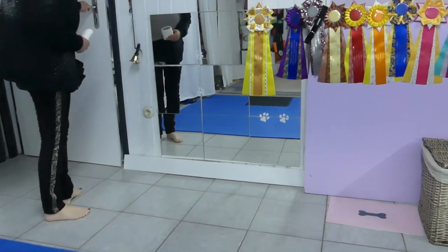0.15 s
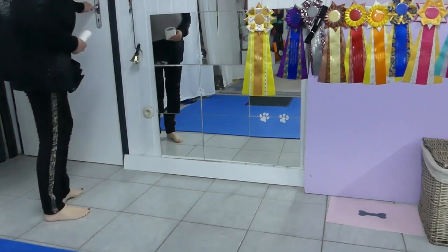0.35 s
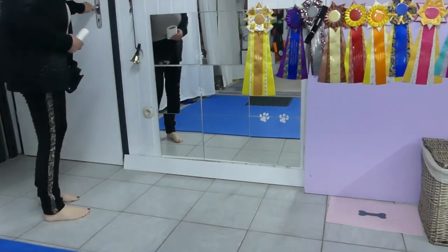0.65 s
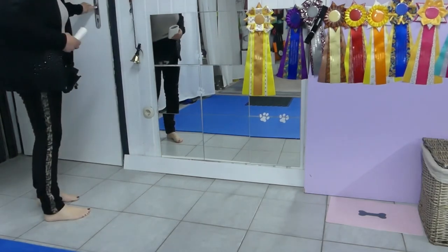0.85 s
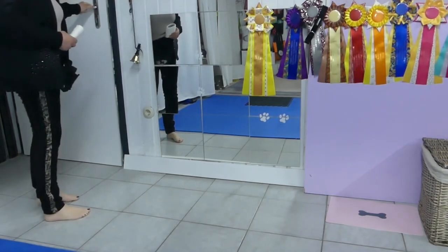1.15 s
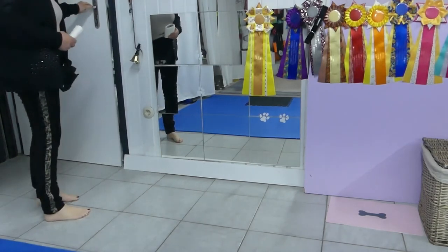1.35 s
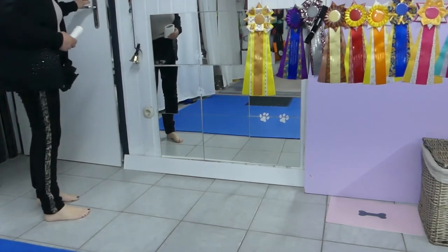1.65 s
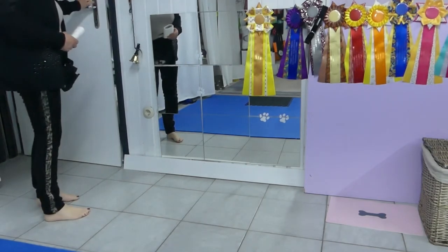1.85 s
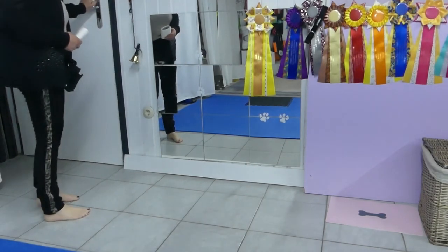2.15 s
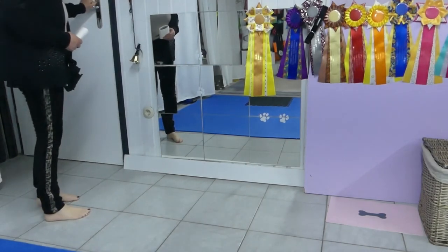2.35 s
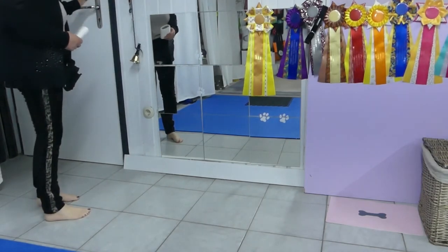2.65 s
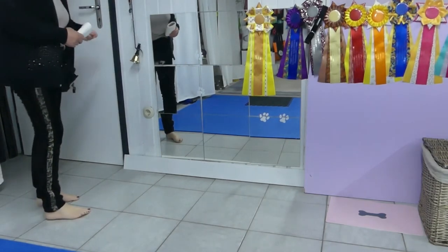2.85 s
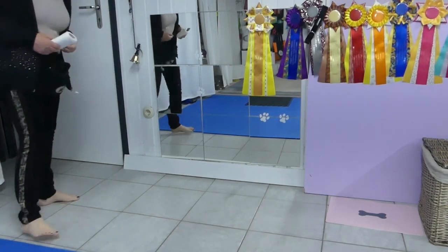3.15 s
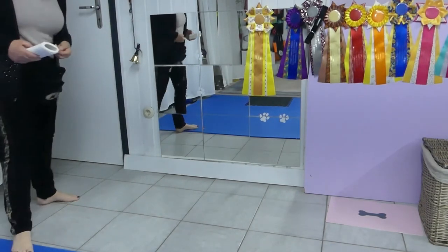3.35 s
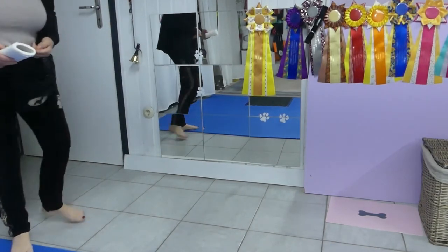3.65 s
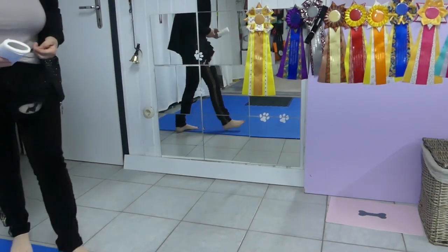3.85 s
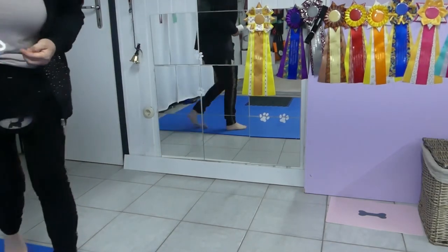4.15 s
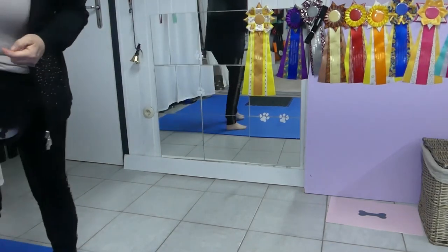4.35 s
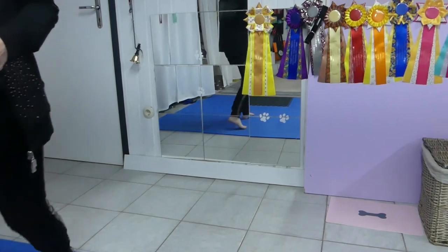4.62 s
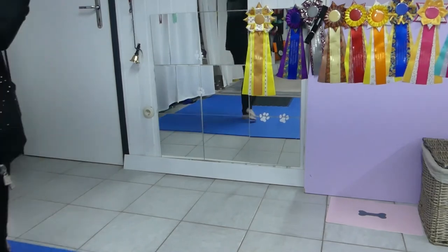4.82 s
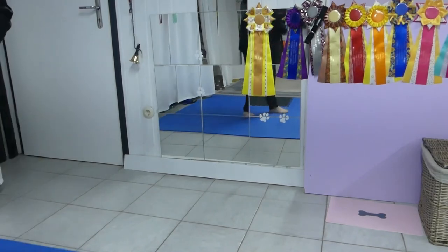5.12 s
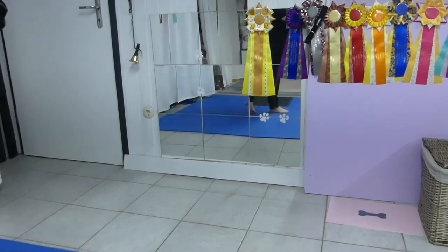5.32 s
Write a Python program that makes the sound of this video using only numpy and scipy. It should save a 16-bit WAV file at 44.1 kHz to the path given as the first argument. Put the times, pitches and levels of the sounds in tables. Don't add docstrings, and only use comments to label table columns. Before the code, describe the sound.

Stuttering hinge creak and metallic latch clack, a brief rattle, a hard door slam, then faint zip ticks and rustling as someone walks off barefoot.

```python
import sys
import numpy as np
from scipy import signal
from scipy.fft import rfft, irfft, next_fast_len
from scipy.io import wavfile
from scipy.ndimage import map_coordinates

SR = 44100
rng = np.random.default_rng(int(sys.argv[2]) if len(sys.argv) > 2 else 0)


def invert_db(level):
    return 10 ** (np.asarray(level, dtype=float) / 20)


def bounce(signal):
    frames = np.transpose(np.atleast_2d(signal))
    limited = np.clip(frames, -1, 1)
    pcm = np.round(limited * 32767).astype(np.int16)
    wavfile.write(sys.argv[1], SR, pcm)


N = 241800
LATCHED, LEANS, SHUT = 0.36, 0.75, 2


def unit(x):
    return x / np.sqrt(np.mean(x ** 2) + 1e-20)


def along(points, hz):
    f, v = np.transpose(points)
    return np.interp(np.log(hz + 1), np.log(f + 1), v)


def filtered(x, response):
    m = next_fast_len(x.shape[-1] + SR // 2)
    spectrum = rfft(x, m) * response(np.fft.rfftfreq(m, 1 / SR))
    return irfft(spectrum, m)[..., :x.shape[-1]]


def body(peaks):
    def response(f):
        h = 0
        for k, (centre, width, db) in enumerate(peaks):
            damping = 1j * f * width
            h = h + (-1) ** k * invert_db(db) * damping / (centre * centre - f * f + damping)
        return h / np.sqrt(np.mean(abs(h) ** 2))
    return response


def coloured(spectrum):
    return unit(filtered(rng.standard_normal(N), lambda hz: invert_db(along(spectrum, hz))))


def hollow(hz, width):
    return unit(filtered(rng.standard_normal(N), lambda f: body([(hz, width, 0)])(f) ** 2))


def paired(pair, alike):
    turn = lambda hz: np.arccos(np.clip(along(alike, hz), -1, 1)) / 2
    mid, side = filtered(pair, lambda hz: np.array([np.cos(turn(hz)), np.sin(turn(hz))]))
    return np.array([mid + side, mid - side])


def burst(s, db, length, fall, rise=0.001):
    out, first = np.zeros(N), int(s * SR) + 1
    t = np.arange(first, min(N, first + int((length + 2 * fall) * SR))) / SR - s
    decay = invert_db(db - 60 * np.maximum(t - length, 0) / fall)
    out[first:first + len(t)] = decay * np.minimum(t / rise, 1)
    return out


def ring(s, db, hz, t60, rise=0.00013, sag=0):
    sag_s = 0.0391
    out, first = np.zeros(N), round(s * SR)
    t = np.arange(min(N - first, int(1.5 * t60 * SR))) / SR
    bent = t - sag * sag_s * np.expm1(-t / sag_s)
    out[first:first + len(t)] = invert_db(db - 60 * t / t60) * np.sin(2 * np.pi * hz * bent) * (1 - np.exp(-t / rise))
    return out


# f/Hz, level/dB
TONE_COLOUR = [(12, -36), (20, -20), (156, -4), (189, -3), (224, -3), (273, -3.5), (440, -4.5), (1240, -15),
               (1350, -16.5), (1950, -19.5), (2970, -26.5), (15200, -26.5), (16500, -54.5)]
# f/Hz, left-right likeness
TONE_ALIKE = [(60, -0.65), (180, -0.86), (550, -0.74), (1650, -0.52), (4970, 0.27), (15000, 0.45)]


def hush():
    pair = paired(rng.standard_normal((2, N)), TONE_ALIKE)
    return invert_db(-55) * unit(filtered(pair, lambda hz: invert_db(along(TONE_COLOUR, hz))))


# t/s, peak level/dB
PUSHED = [
    (0.0322, -38),
    (0.0839, -32),
    (0.135, -31.5),
    (0.1799, -31),
    (0.2197, -29.5),
    (0.2561, -30.5),
    (0.2916, -30),
    (0.3261, -29.5),
]
# t/s, length/s, peak level/dB, peak delay/s, rise and fall/(dB/s)
CHATTER = [
    (0.7133, .015, -40, .001, 150),
    (0.7966, .075, -31.5, 0.03, 100),
    (1.0817, .045, -36, .001, 402),
    (1.1634, .005, -43.5, 0.0012, 200),
    (1.2145, .005, -46, 0.00094, 197),
]


def slips(count=9):
    jerks = [(s, db, -11.5 + 22.5 * s, -3, -11.5) for s, db in PUSHED]
    first_gap_s, quickens = 0.0142, 0.935
    after = first_gap_s * (1 - quickens ** np.arange(count)) / (1 - quickens)
    for s, length, db, peak, slope_db in CHATTER:
        for t in after[after < length]:
            jerks.append((s + t, db - slope_db * abs(t - peak), -13.5, -15, -35.5))
    return jerks


def jerk(s, db, pitch, count=200):
    out, t = np.zeros(N), np.arange(-count, count) / SR
    plate_hz, wind_up_s, spike_s = 1500, 0.0009, 0.00016
    swell = np.exp(np.where(t < 0, t, -4 * t) / wind_up_s)
    wound = invert_db(4) * np.cos(2 * np.pi * plate_hz * pitch * t) * swell
    spike = invert_db(5.5) * np.exp(-(pitch * t / spike_s) ** 2)
    shape = -wound - spike if s < LATCHED else spike
    out[round((s - 0.0002) * SR) - count:][:2 * count] = invert_db(db) * shape
    return out


# f/Hz, width/Hz, level/dB
LEAF_BODY = [(96.4, 5.9, -0.5), (214, 43, 2), (294, 45, 3.5), (369, 59, 4), (473, 82, -0.5), (693, 73, -3),
             (884, 13, -5.5), (1180, 150, -14), (1387, 44, -6), (1470, 21, -32), (1670, 36, -5.5),
             (2100, 120, -13.5), (2350, 67, -8.5)]
# f/Hz, level/dB
GRIT_COLOUR = [(2400, -32), (3000, -5.5), (3600, -4), (5500, -3), (7000, -6.5), (10400, -11.5),
               (15500, -18), (16500, -35)]
# f/Hz, level/dB
GROAN = [(41, -36.5), (70, 3), (428, 4.5), (621, -4), (933, -4.5), (1140, -8.5), (1840, -16.5), (2300, -16),
         (2800, -32.5), (4000, -47.5), (5200, -55), (8800, -120)]
# f/Hz, level/dB
SHUDDER = [(59, -38), (100, -10), (407, 2), (628, -2.5), (895, 1.5), (1340, -8.5), (2230, -13), (3030, -28),
           (4000, -32), (5200, -56.5), (8800, -120)]


def hinge():
    jolts, spit, shudder, knock = np.zeros((4, N))
    for (s, db, grit_db, shudder_db, _), pitch in zip(slips(), rng.uniform(0.81, 1.2, size=40)):
        jolts[round(s * SR)] = invert_db(db + 15.5)
        knock += jerk(s, db, pitch)
        spit += burst(s - 0.002, db + grit_db - 5, 0.002, 0.015)
        spit += burst(s, db + grit_db - 24, 0.0072, 0.19)
        shudder += burst(s + 0.002, db + shudder_db, 0.0081, 0.099)
    dull = lambda hz: 1 / (1 + 1.3j * hz / 2500 - (hz / 2500) ** 2) ** 2
    wood = filtered(filtered(jolts, body(LEAF_BODY)), dull)
    colour = np.where(np.arange(N) < LATCHED * SR, coloured(GROAN), coloured(SHUDDER))
    return wood + spit * coloured(GRIT_COLOUR) + shudder * colour, knock


# f/Hz, level/dB, t60/s
BOOM_MODES = [
    (63.48, 1, .93),
    (67.44, -9.8, .91),
    (69.21, -4, .94),
    (77.5, -20, .6),
              (96.5, -8, 1), (101, -9, 0.53), (111.6, -12, 0.7), (171.4, -17, 0.81)]


def boom():
    blows = [(s, boom_db) for s, *_, boom_db in THUDS]
    blows += [(s, db + boom_db) for s, db, *_, boom_db in slips()]
    kicks = np.zeros((2, N))
    for s, db in blows:
        kicks[int(s >= SHUT), round(s * SR)] += invert_db(db)
    modes = []
    for lasting in (0.6, 1):
        modes.append(sum(ring(0, db, hz, t60 * lasting, 0.015) for hz, db, t60 in BOOM_MODES))
    return signal.fftconvolve(kicks, modes, axes=1)[:, :N].sum(axis=0)


# t/s, level/dB
STRIKES = [(.0335, -51), (0.0846, -59), (.136, -43), (0.179, -45.5), (.22, -48), (.257, -41), (.292, -37.5),
           (0.328, -34.5), (.366, -33), (0.391, -29), (.558, -38), (.81, -45), (.847, -42.5),
           (1.083, -56.5), (2.099, -26), (2.111, -31)]
# f/Hz, level/dB, t60/s
AJAR = [(143, -9, 0.12), (188.6, -2, 0.16), (249, -14, 0.78), (392.6, -8, 0.67), (484, -20, 0.95),
        (543, -12, 0.19), (668, -6, 0.52), (778, -9, 0.41), (893.6, 0, 0.32), (1174, -6, 0.3)]
# f/Hz, level/dB, t60/s
RESTING = [(251, -14, 0.61), (375, -5, 0.25), (503, -17, 0.47), (557, 6.5, 0.43), (630, -27, 0.41),
           (730, -14, 0.3), (895, 2.5, 0.24), (1050, -28, 0.41)]
# f/Hz, level/dB, t60/s
SEATED = [(155.5, 8, 0.17), (227, -4, 0.33), (308, -32, 0.16), (398, 3.5, 0.133), (434, -15, 0.62),
          (579, -13.5, 0.44), (850, -23, 0.218), (1160, -30.5, 0.79)]


def panel():
    out = np.zeros(N)
    sway = rng.normal(0, 2.4, (len(STRIKES), len(AJAR)))
    for (s, db), row in zip(STRIKES, sway):
        modes = AJAR if s < LEANS else RESTING if s < SHUT else SEATED
        for (hz, level, t60), odd in zip(modes, row):
            out += ring(s, db + level + odd, hz, t60, 0.0046, sag=0.15 * (s > SHUT))
    return out


# t/s, level/dB, length/s, ring f/Hz, ring level/dB
CONTACTS = [(0.3572, -28.5, 0.002, 3940, 2), (0.3605, -25.5, 0.0042, 3870, 1.5),
            (0.367, -29.5, 0.0054, 4400, -1), (0.382, -37.5, 0.028, 4170, -13),
            (0.459, -46.5, 0.0082, 7160, -17), (0.55, -38, 0.002, 3280, -12),
            (0.5548, -34.5, 0.0052, 9000, -11.5), (0.572, -42, 0.013, 4980, -3.5),
            (0.713, -48.5, 0.0047, 4800, -6), (0.72, -49.5, 0.011, 3340, -5),
            (0.734, -57.5, 0.035, 2500, -2), (0.403, -38, .004, 5160, -3), (0.414, -40, .006, 3900, 1),
            (2.141, -37, .006, 2500, -9), (2.16, -44, .006, 5600, -8), (1.155, -58, 0.02, 3600, -13),
            (2.078, -51, 0.005, 3500, -20), (2.0878, -25, 0.0022, 2420, -10),
            (2.089, -21, 0.0061, 3530, -10.5), (2.116, -28.5, 0.0038, 5350, -14),
            (2.126, -30, 0.0044, 5970, -9)]
# f/Hz, level/dB
STEEL = [(900, -38.5), (1400, -4.5), (1800, -5.5), (2920, -4.5), (3750, -4.5), (4430, -5.5), (8930, -10.5),
         (14800, -22.5), (16500, -28.5)]
# t/s, level/dB, f/Hz, t60/s
PINGS = [
    (.556, -29.5, 5900, 0.035),
    (.3615, -26, 3850, 0.035),
    (2.092, -23.5, 5600, .04),
    (2.117, -26, 5400, 0.045),
]


def latch():
    out, tone = np.zeros((2, N))
    for s, db, length, ring_hz, ring_db in CONTACTS:
        tilt_db = np.clip(0.2 * (db + 25), -8.5, 0)
        chatter = coloured([(hz, level + tilt_db * np.log2(hz / 4000)) for hz, level in STEEL])
        out += burst(s, db, length, 0.056) * chatter
        tone += burst(s, db + ring_db, length, 0.036) * hollow(ring_hz, 480)
    for s, db, hz, t60 in PINGS:
        tone += ring(s, db, hz, t60, 0.0012)
    return out, tone


# t/s, level/dB, length/s, boom level/dB
THUDS = [(0.358, -23.5, 0.024, -43.5), (0.382, -24, 0.043, -30), (0.434, -41, 0.019, -32.5),
         (0.556, -38.5, 0.04, -39), (0.71, -42, 0.023, -51), (1.268, -66, 0.13, -67.5),
         (2.024, -58, 0.15, -78), (2.077, -34, 0.026, -76), (2.098, -21, 0.0016, -77),
         (2.109, -22, 0.0042, -71.5), (2.1125, -44.5, .002, -24.5), (2.119, -32.5, 0.0045, -67.5)]
# f/Hz, level/dB
FRAME = [(47, -29.5), (80, -8), (104, -15), (166, -0.5), (290, -11), (385, 1), (430, -4.5), (549, -7.5),
         (710, -12), (865, -7), (1150, -19.5), (1610, -16.5), (2460, -37), (3000, -43.5), (3900, -36.5),
         (6600, -120)]


def thuds():
    return coloured(FRAME) * sum(burst(s, db, length, 0.11) for s, db, length, _ in THUDS)


# t/s, level/dB, width/s
SLAPS = [
    (2.1003, -10, .0006),
    (2.111, -13, .0009),
    (.4368, -17, .0008),
]


def slap():
    out = np.zeros(N)
    for s, db, width in SLAPS:
        u = ((np.arange(N) / SR - s) / width) ** 2
        out += invert_db(db) * (2 * u - 1) * np.exp(-u)
    return out


# t/s, peak level/dB, ring level/dB, rebound level/dB
TICKS = [(0.661, -49, -24, -14), (0.912, -37, 1, -11), (1.1543, -47, -22.5, -15), (3.6268, -38, 5, 0),
         (4.0823, -45.5, -16, -10), (4.3135, -40, 2, -4.5), (4.8232, -34.5, -4, -23),
         (4.8932, -36.5, -20, -16), (5.0587, -38.5, -21.5, -20), (5.1117, -37.5, -1, -10),
         (5.138, -55, -8, -20), (5.16, -54, -8, -20)]
# t/s, peak level/dB, rattle level/dB
JANGLES = [
    (3.15, -34, -56),
    (3.3685, -38.5, -60.5),
]
# t/s from the jolt, level/dB
JANGLE = [
    (-.004, -4),
    (-.0018, -7),
    (0, -5),
    (.0035, -0.5),
    (.006, -10),
    (.021, -14),
    (.032, -13),
]
# f/Hz, level/dB, t60/s
TAB = [
    (13850, -4, 0.03),
    (13100, -11, .03),
    (9500, -19, 0.062),
]
# f/Hz, level/dB
SNAP = [(1760, -65), (4000, -15), (8200, -6.5), (10100, 1), (13400, -1.5), (15500, -3), (16500, -31)]


def zip_pull():
    snap, tab = np.zeros((2, N))
    contacts = [(s, db, ring_db) for s, db, ring_db, _ in TICKS]
    contacts += [(s + 0.0058, db + back_db, ring_db - 18) for s, db, ring_db, back_db in TICKS]
    contacts += [(s + lag, db + loss_db, -23) for s, db, _ in JANGLES for lag, loss_db in JANGLE]
    for s, db, ring_db in contacts:
        snap += burst(s, db - 3, 0.0012, 0.004)
        tab += sum(ring(s, db + ring_db + level + 2, hz, t60) for hz, level, t60 in TAB)
    snap += sum(burst(s, -62.5, 0.015, 0.12) for s, *_ in TICKS)
    snap += sum(burst(s, rattle_db, 0.033, 0.14) for s, _, rattle_db in JANGLES)
    return snap * coloured(SNAP) + tab


# t/s, level/dB, length/s, f/Hz, width/Hz
SCUFFS = [(3.276, -55.5, 0.027, 3190, 896), (3.28, -62, 0.018, 6250, 600), (3.312, -55, 0.016, 4230, 900),
          (3.79, -60, 0.0092, 13600, 2000), (3.862, -57.5, 0.024, 9500, 3000),
          (3.923, -55, 0.016, 2780, 900), (3.983, -59, 0.032, 3090, 500), (4, -61, .015, 13800, 1200),
          (4.129, -56.5, 0.017, 2920, 800), (4.132, -51.5, 0.0089, 9050, 1500),
          (4.659, -54, 0.015, 3060, 497), (4.664, -62, .025, 4420, 400), (1.272, -59.5, 0.095, 333, 30),
          (4.924, -54, 0.016, 2920, 610), (4.958, -58, 0.035, 1740, 900), (5.053, -56, 0.032, 2850, 800),
          (5.296, -44.5, 0.009, 2200, 900)]


def scuffs():
    return sum(burst(s, db, length, 0.02, rise=0.006) * hollow(hz, width) for s, db, length, hz, width in SCUFFS)


def draught():
    return burst(1.9, -70, 0.17, 0.05) * hollow(76.7, 40)


# t/s, hiss peak level/dB, crinkle f/Hz, fade/(dB/s)
FOLDS = [(2.64, -66, 1500, 43), (2.739, -66, 2350, 300), (2.841, -64, 1820, 81.5), (3.17, -63, 2300, 250),
         (3.291, -54, 3240, 93), (3.45, -63.5, 1510, 28), (3.53, -61, 2290, 200.5), (3.8, -64.5, 1850, 26),
         (3.93, -55.5, 2710, 38), (4.131, -53, 2700, 182), (4.42, -62, 2190, 62), (4.48, -56, 2080, 111),
         (4.531, -53.5, 1740, 58), (4.678, -53.5, 3270, 350), (4.87, -62, 2120, 258),
         (4.928, -57, 2940, 84), (5.0, -60, 1700, 3), (5.079, -54.5, 3070, 45), (5.19, -57, 2290, 8),
         (5.26, -55, 2290, 32), (5.285, -53.5, 2470, 63), (5.305, -50.5, 2320, 300), (5.35, -61, 1890, 80)]


def folds():
    t, hiss_db = np.arange(N) / SR, np.full(N, -79.5)
    for s, db, _, fade_db in FOLDS:
        drop_db = np.where(t < s, 294 * (s - t), fade_db * (t - s))
        hiss_db = np.maximum(hiss_db, db - drop_db)
    s, _, hz, _ = np.transpose(FOLDS)
    crinkle_db = -48.5 + 2.8 * (hiss_db + 52.5)
    return hiss_db, crinkle_db, np.interp(t, s, hz)


# f/Hz, level/dB
CLOTH = [(290, 4.5), (500, -5.5), (1040, -7.5), (2360, -5), (4690, -7), (9330, -7.5), (15100, -11.5),
         (15800, -30), (16500, -43)]


def rustle(count=12000):
    hiss_db, crinkle_db, pitch_hz = folds()
    near = np.clip((np.arange(N) / SR - 2.6) / 0.1, 0, 1)
    flurry = map_coordinates(rng.standard_normal(N // 400 + 4), [np.arange(N) / 400])
    hiss = invert_db(hiss_db + 2.7 * flurry) * coloured(CLOTH)
    when, spread, size = rng.random((count, 3)).T
    start = ((2.6 + 2.87 * when) * SR).astype(int)
    hz = (pitch_hz[start] * np.exp(spread - 0.5))[:, None]
    t = np.arange(300) / SR
    loudness = invert_db(-3 * np.log(size + 0.00033))[:, None]
    grains = loudness * np.sin(2 * np.pi * hz * t) * np.exp(-hz * t / 1.6)
    places = start[:, None] + np.arange(len(t))
    crinkle = np.bincount(places.ravel(), grains.ravel(), N + len(t))[:N]
    return near * (hiss + invert_db(crinkle_db - 5.5) * unit(crinkle))


# t/s, level/dB, f/Hz, t60/s
TAPS = [
    (4.469, -49.5, 2100, 0.047),
    (4.528, -44.5, 1634, 0.13),
    (4.53, -45.5, 2060, 0.073),
    (4.53, -45, 1252, 0.15),
    (4.529, -52.5, 1534, 0.15),
    (4.529, -52.5, 1717, 0.1),
    (4.599, -58, 1590, .2),
    (4.733, -49, 300, 0.016),
    (4.97, -60, 1700, 0.047),
]


def plastic():
    return sum(ring(s + lag, db - 200 * lag, hz, t60) for s, db, hz, t60 in TAPS for lag in (0, 0.007, 0.013))


# f/Hz, t60/s
ROOM_DECAY = [(60, 0.94), (130, .4), (250, 0.33), (1000, 0.66), (3000, 0.39), (8000, 0.27), (14000, 0.21)]
# f/Hz, left-right likeness
ECHO_ALIKE = [(60, 0.8), (500, 0.8), (1100, .2), (2500, 0.15), (12000, 0.1)]


def room(x, part=4096):
    out = np.zeros((2, N))
    half = 0.5 + 0.5 * np.sin(np.pi * np.arange(N) / part)
    for share in (half, 1 - half):
        noise = paired(rng.standard_normal((2, SR)), ECHO_ALIKE)
        hz, t, z = signal.stft(noise, SR, nperseg=256)
        t60 = along(ROOM_DECAY, hz)[:, None]
        tail = signal.istft(z * invert_db(-60 * t / t60) / np.sqrt(t60), SR, nperseg=256)[1]
        late = np.pad(x * share, (130, 0))[None]
        out += signal.fftconvolve(late, tail / np.linalg.norm(tail[0]), axes=1)[:, :N]
    return out


# f/Hz, left minus right level/dB
DOOR_LEAN = [(60, -1.5), (240, .5), (950, 2.5), (3770, 2.5), (15000, 0)]


def scene():
    creak, knock = hinge()
    low = boom()
    steel, tone = latch()
    thud = thuds()
    walker = zip_pull() + scuffs() + rustle() + plastic()
    walker = filtered(walker, lambda hz: 1 / (1 + (300 / (hz + 1)) ** 4))
    door = creak + knock + steel + tone + slap() + thud + panel() + draught()
    aim = lambda hz: invert_db(np.outer([0.5, -0.5], along(DOOR_LEAN, hz)))
    lag = np.array([low, np.roll(low, 24)])
    send = invert_db(1.5) * creak + invert_db(-2.5) * (knock + steel) + invert_db(-8) * tone
    send += invert_db(-3.5) * thud + invert_db(-0.5) * walker
    return filtered(door[None], aim) + lag + walker * invert_db([[0.7], [-0.7]]) + room(send) + hush()


def top_cut(x):
    return signal.sosfilt(signal.butter(12, 16660, fs=SR, output="sos"), x)


# f/Hz, width/Hz, depth 0-1
HOUSING_DIP = (7660, 240, 0.41)


def record(dry):
    hz0, width, depth = HOUSING_DIP
    dip = lambda hz: 1 - depth * np.exp(-((hz - hz0) / width) ** 2)
    low_cut = lambda hz: 1j * hz / (60 + 1j * hz)
    top = lambda hz: 0.1 + 0.9 / (1 + (hz / 15850) ** 150)
    mix = filtered(dry, lambda hz: dip(hz) * low_cut(hz) * top(hz))
    return top_cut(mix)


dry = scene()
out = record(dry)
bounce(out)
```